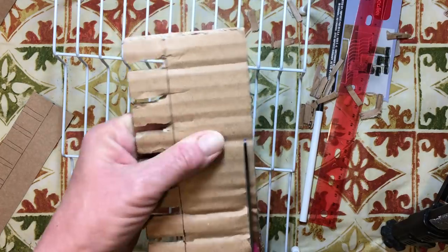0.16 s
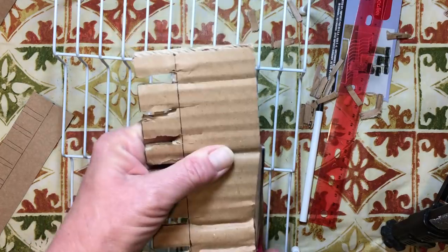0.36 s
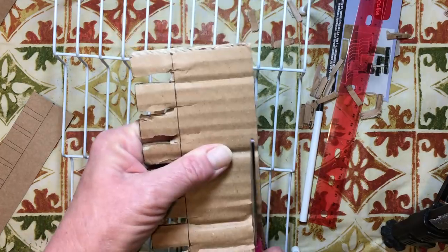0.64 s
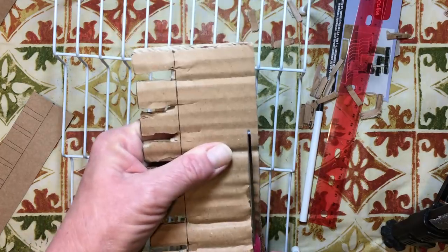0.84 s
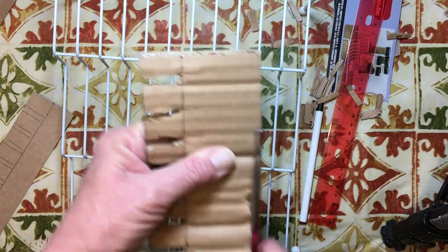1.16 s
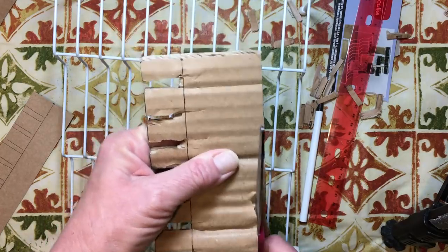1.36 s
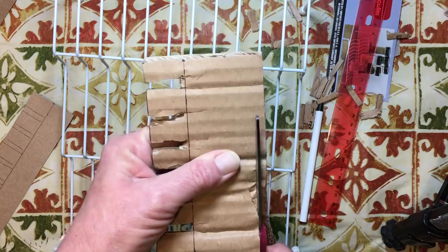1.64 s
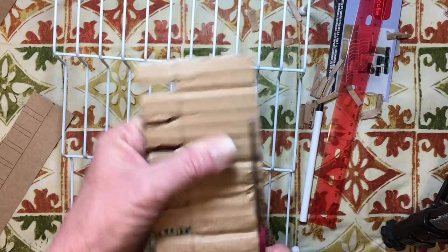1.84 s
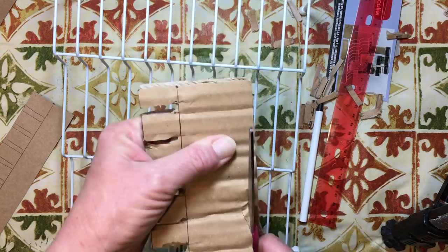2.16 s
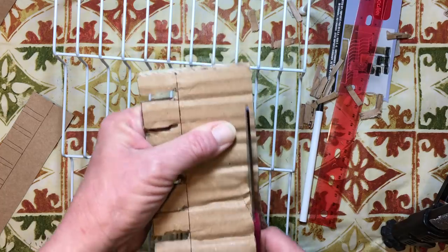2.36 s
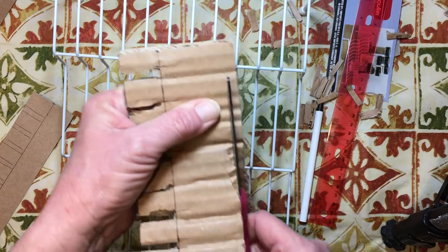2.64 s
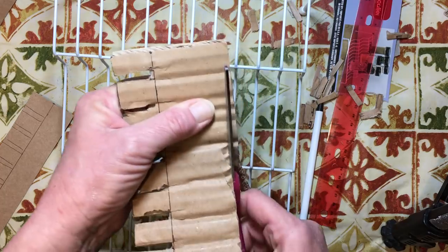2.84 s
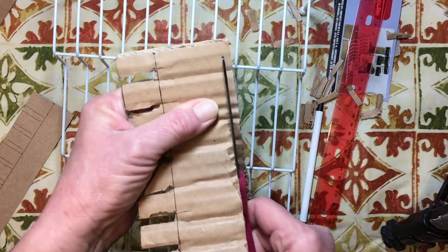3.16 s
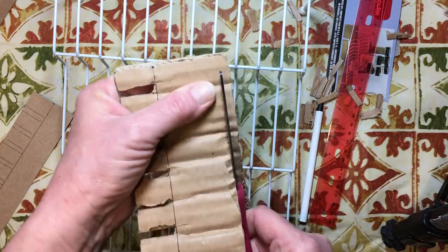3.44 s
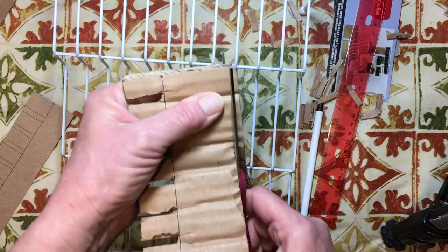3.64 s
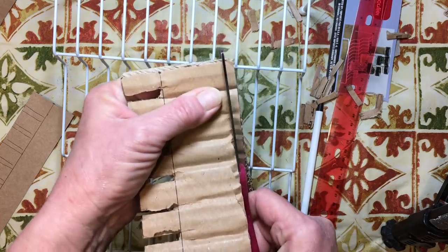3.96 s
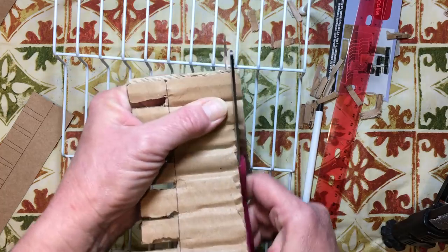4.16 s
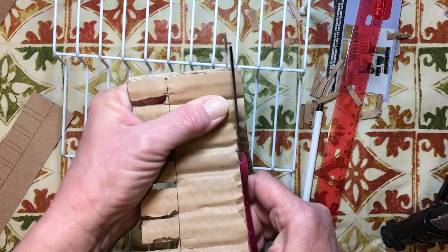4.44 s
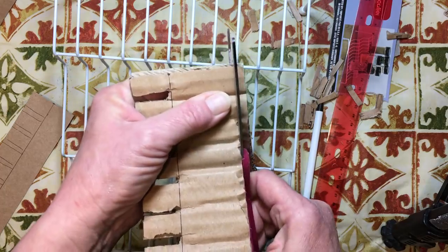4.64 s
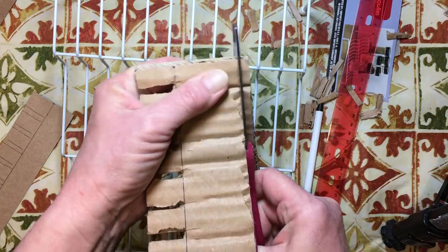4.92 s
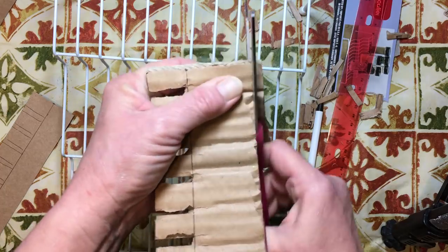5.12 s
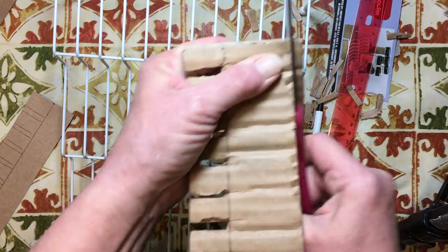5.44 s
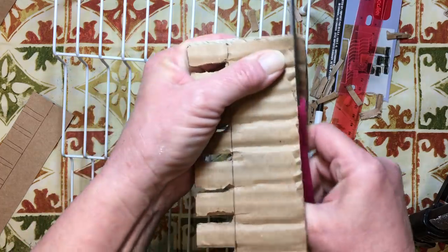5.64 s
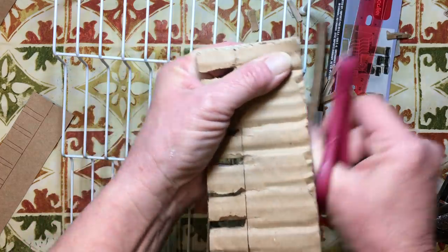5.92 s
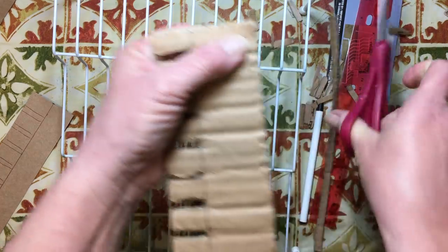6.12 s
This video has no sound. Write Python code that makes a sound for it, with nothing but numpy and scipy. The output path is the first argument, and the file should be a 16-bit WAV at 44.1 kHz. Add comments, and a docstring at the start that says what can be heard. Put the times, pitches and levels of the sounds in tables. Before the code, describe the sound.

Close scissors crunch and snap through a cardboard strip in repeated cuts, with light scraping and handling in a quiet room.

```python
"""Scissors cut a strip of corrugated cardboard, close to a mono microphone in a quiet room.
The closing blades snap through the flutes: each fracture cracks, rings the free flap and bends the strip.
Between cuts the open blades slide along the edge with a bright friction rasp, and fingers rustle the board.
At last the scissors are laid down with a few soft knocks. Short reflections follow every sound,
and a low hum hangs in the room."""
import sys
import numpy as np
from scipy import signal
from scipy.fft import rfft, irfft
from scipy.io import wavfile

SR = 44100
rng = np.random.default_rng(int(sys.argv[2]) if len(sys.argv) > 2 else 0)


def store_wav(level_fs):
    """Save 16-bit WAV to argv[1]."""
    pcm = np.round(np.clip(np.atleast_2d(level_fs), -1, 1) * 32767)
    wavfile.write(sys.argv[1], SR, pcm.T.astype(np.int16))


N = 277212

# Fractures, with flap and bending levels relative to level_db:
# (peak_s, level_db, flap_db, bending_db, rise_ms, fall_ms)
FRACTURES = [(0.03, -27.5, -16, -20, 0.65, 0.58), (0.1005, -23, -13, -34, 1.2, 0.44),
             (0.6106, -12.5, -36, -56, 0.55, 1.5), (0.695, -24.5, -13, -17, 1, 3.8),
             (0.6992, -31, -4, -8.5, 1.4, 1.1), (0.7222, -27, -12.5, -17, 2.2, 2.2),
             (0.776, -27, -6.5, -13.5, 0.56, 6.8), (0.796, -18, -48, -42, 1.2, 0.59),
             (0.814, -14, -25, -14, 2, 9.7), (0.823, -19, -5, -22, 1.8, 3),
             (0.827, -12, 7, -17.5, 0.47, 3.6), (0.841, -36, 2, -26, 2.7, 10),
             (0.871, -24, -3, -24, 1, 1.5), (0.8752, -22.5, -4, -12, 2.8, 1.7),
             (0.893, -16.5, -14, -28, 0.74, 0.49), (0.944, -33.5, -21, -36, 1, 3.6),
             (1.0394, -27.5, -11, -27.5, 1.6, 0.5), (1.106, -23.5, -12.5, -25, 0.93, 0.47),
             (1.33, -28.5, -6, -39, 1.5, 1.3), (1.5113, -32.5, -5, -1.5, 7.1, 4.4),
             (1.5352, -23.5, -9, -15.5, .56, 1.2), (1.566, -17, -3.5, -11.5, 6.4, 1.8),
             (1.6052, -9.5, -18.5, -10, 2.2, 3.7), (1.627, -27, -24, -20, 2.7, 1),
             (1.6497, -24.5, -9, -9, 1.4, 5.1), (1.6585, -15.5, -16, -46, 0.55, 1.5),
             (2.324, -26, -18.5, -40, 1.1, 0.47), (2.367, -24, -20, -15, 2.7, 2),
             (2.3706, -12, -10.5, -24, 0.73, 3.9), (2.4, -12.5, -17.5, -29, 6.6, 5.9),
             (2.419, -25.5, -14, -14, 5.6, 11), (2.4372, -29.5, -3, -13, 3.3, 7.2),
             (2.4713, -16, -16, -32, 0.73, 0.35), (2.491, -17.5, -4, -13, 1, 4.9),
             (2.506, -8.5, -14, -29, 0.61, 0.6), (2.516, -21, -27, -41, 1.5, 0.58),
             (2.5276, -26, -9, -9, 0.95, 1.1), (2.532, -11, -16.5, -18, 2, 0.51),
             (2.61, -33, -9, 5.5, 3, 5.4), (3.0248, -31.5, -19, -42, 1.6, 0.8),
             (3.056, -22, -15.5, -20, 2.4, 1.7), (3.094, -3.5, -5.5, -25.5, 0.88, 1.44),
             (3.1313, -16.5, -8, -11, 1.1, 1.7), (3.135, -17.5, -4, -14, 2, 1.5),
             (3.174, -20, -12, -6, 1, 3), (3.1992, -3, -11, -19, 0.6, 1.96),
             (3.218, -23, -13, -20, 0.73, 1.1), (3.8591, -24.5, -15.5, -9, 5.7, 1),
             (3.8825, -27, -30, -8, 0.87, 1.2), (3.9001, -3, -2.5, -26, 0.47, 3),
             (3.926, -30.5, -15, 2, 4.5, 3.5), (3.9482, -22, -15, -21, 1.1, .58),
             (3.981, -4.5, -9.5, -22.5, 1.4, 1.4), (3.9913, -19, -34, -32, 0.91, .8),
             (4.0102, -6, -17.5, -29.5, 0.69, 1.3), (4.129, -23.5, -15.5, -41, 0.92, .5),
             (4.385, -29, -29, -20, 1.2, 0.72), (4.416, -30, -44, -34, 0.4, 0.57),
             (4.4819, -16.5, -5, -15.5, 0.37, 8.2), (4.4916, -15.5, -12, -40, 5.9, 3.6),
             (4.519, -26, -19, -38, 0.55, 0.5), (4.5269, -18.5, -18.5, -45, 0.78, 0.48),
             (4.749, -25, -16, -23, 0.8, 4.3), (4.758, -25.5, -16.5, -28, 2.5, .6),
             (4.7771, -18, -6.5, -3, 2.7, 2.6), (4.8, -24, -37, -39, 1.3, .58),
             (4.813, -30.5, -19, 0, 2.9, 1.5), (4.8352, -16, -12.5, -13, 5.5, 1.8),
             (4.8831, 0.5, -21, -29, 1.6, 0.7), (4.901, -27, -31, -1, 3.1, 11),
             (4.9082, -17.5, -13, -17, 0.84, 4), (4.915, -13.5, -43, -26, 2, 1.4),
             (4.988, -30, -3, -39, 1.6, 1.6), (5.2933, -31, -21, -28, 1.4, 2.1),
             (5.325, -22.5, -18, -31, 0.9, .5), (5.359, -30, -32, -38, 1, .5),
             (5.3797, -24.5, -42, -46, 1.5, .5), (5.419, -25, -13, -9, 1.4, 8.1),
             (5.4337, -21.5, -3.5, -11, 1.7, 2.7), (5.4744, -5.5, -7.5, -16, 1.27, 2.2),
             (5.49, -8, -9, -25, 2, 0.16), (5.514, -11, -16, -18, 0.61, 2.5),
             (5.5193, -8.5, -22, -22, 1.6, 0.78), (5.5285, -10, -20, -27, 0.53, .5),
             (5.531, -6, -19, -14, 1.2, 2.2), (5.543, -21, -10, -10, 1.9, 0.91),
             (5.552, -18.5, -19, -6, 1.4, 1.8), (5.832, -20, -27, -24.5, 1, 0.58),
             (5.8443, -17.5, -18, -33, 0.89, 3), (5.8916, -5, -30, -19.5, 0.74, 5.4),
             (5.8979, -13, -8, -31, 2.2, 6.3), (5.9078, -7, -21, -23, 0.93, 0.69),
             (5.912, -17, -4.5, -6.5, 1.4, 1.4), (6.171, -34.5, -11, -6, 0.99, 11)]
# Ring of the blades, moving with the point of contact: (time_s, pitch_hz)
BLADE_PITCH = [(0, 5870), (.82, 8100), (1.6, 5500), (2.5, 7000), (3.09, 5750), (3.2, 5900), (3.9, 6140),
               (4.01, 6500), (4.88, 6740), (5.475, 7140), (5.49, 5550), (5.53, 7100), (5.55, 6030),
               (5.9, 8400)]
# Spectrum of breaking fibres: (frequency_hz, level_db)
CRACK_SPECTRUM = [(1180, -34), (2000, -5), (2870, -6.5), (3600, -5.5), (4200, -6), (5530, -5), (6240, -2),
                  (7610, -3.5), (9280, -1), (10500, -3), (12800, 1.5), (15700, -1)]


def snaps():
    """Brittle fracture: a burst of breaking fibres cracks and excites the blades, flap and strip."""
    size, lead = 4096, 1024   # samples in a burst, and before its peak
    ms = (np.arange(size) - lead) * 1000 / SR
    before_ms, after_ms = np.minimum(ms, 0), np.maximum(ms, 0)
    straining = 0.11 * np.exp(before_ms / 2.14) * (ms < 0)   # fibres stretch before they give
    settling = 0.13 * np.exp(-after_ms / 2.0)   # torn fibres creak on
    crack, flap = np.zeros((2, N + size + lead))
    forces = np.zeros((len(STRIP_MODES), N + size + lead))
    for s, db, flap_db, bending_db, rise_ms, fall_ms in FRACTURES:
        at = slice(round(s * SR), round(s * SR) + size)
        rise = np.exp(1.4 * before_ms / np.clip(rise_ms, .2, 5))
        fall = np.exp(-after_ms / np.clip(fall_ms, .2, 10))
        burst = grains(size, per_s=16000, spread_db=5.5) * (rise + straining)
        blow = (ms == 0) / max(fall_ms, 1.2)   # a quick break is one sharp blow
        tilt_db = -1.5 - 0.2661 * flap_db   # snaps that shake the board more are duller
        tear = tilted(burst * (fall + settling) + 4.1 * blow, tilt_db)
        blade_ring = resonance(tear, curve(s, BLADE_PITCH), width_hz=550)
        crack[at] += amp(db - 3) * (tear + amp(-6) * blade_ring)
        flap[at] += amp(db + flap_db) * flap_ring(burst * (fall + 0.8 * settling) + 16 * blow, s)
        forces[:, at] += amp(db + bending_db) * bending_forces(rise * fall, ms, s)
    flap = highpass(flap, hz=850, order=4)   # a small flap radiates little bass
    return (coloured(crack, CRACK_SPECTRUM) + flap + strip_bending(forces))[lead:lead + N]


# Note of the free flap of board, set by the grip: (time_s, pitch_hz)
FLAP_PITCH = [(0, 1720), (.83, 1890), (.9, 1790), (1.57, 2030), (1.6, 1180), (1.66, 1220), (2.37, 1490),
              (2.5, 1730), (2.9, 1800), (3.09, 1060), (3.13, 1320), (3.2, 1120), (3.85, 1650), (4.0, 1800),
              (4.5, 1830), (4.85, 2120), (4.89, 2900), (5.43, 2860), (5.476, 2530), (5.49, 2000),
              (5.515, 2700), (5.532, 4000), (5.545, 980), (5.85, 2520), (5.9, 2650), (5.912, 1060),
              (6.29, 1490)]
# Upper resonances of the flap: ratio_to_pitch
FLAP_RATIOS = [2.4, 1.3, 1.9]


def flap_ring(burst, s):
    """Damped resonance: the crushed flap rings briefly at its pitch and nearby modes; unit peak."""
    pitch_hz = curve(s, FLAP_PITCH)
    ring = resonance(burst, pitch_hz, width_hz=520)
    ring -= 0.26 * resonance(burst, max(0.36 * pitch_hz, 1050), width_hz=250)
    ring -= 0.66 * resonance(burst, 1.27 * pitch_hz, width_hz=800)
    for hz in pitch_hz * np.array(FLAP_RATIOS) * rng.uniform(0.85, 1.243, len(FLAP_RATIOS)):
        ring += 0.056 * resonance(burst, hz, width_hz=320)   # torn scraps ring unevenly
    return ring / np.max(np.abs(ring))


# Bending modes of the whole strip: (pitch_hz, width_hz, level_db)
STRIP_MODES = [(82, 19, 5), (156, 57, -4), (250, 97, -6.5), (340, 57, -2.5), (443, 51, 0), (546, 61, 0.5),
               (907, 57, 0)]


def strip_bending(forces):
    """Modal superposition: the bending modes add, alternating in sign, to a low thump."""
    return sum(amp(db + 40.5) * resonance(forces[k], hz, width_hz) * (-1) ** k
               for k, (hz, width_hz, db) in enumerate(STRIP_MODES))


# Bending pitch that the grip lets through best: (time_s, pitch_hz)
GRIP_PITCH = [(0, 452), (.82, 460), (.88, 340), (1.57, 300), (1.61, 455), (2.37, 300), (2.5, 340),
              (2.61, 205), (3.09, 250), (3.14, 220), (3.18, 436), (3.22, 444), (3.86, 173), (3.93, 170),
              (3.98, 298), (4.48, 203), (4.78, 570), (4.84, 543), (4.883, 347), (4.9, 530), (5.42, 260),
              (5.475, 420), (5.514, 330), (5.533, 450), (5.56, 398), (5.89, 470), (5.91, 338), (6.29, 500)]


def bending_forces(envelope, ms, s):
    """Selective damping: a snap jerks every mode, but the grip weakens those far from its pitch."""
    octaves_away = np.abs(np.log2(np.array(STRIP_MODES)[:, :1] / curve(s, GRIP_PITCH)))
    grip_db = -4 * octaves_away + 1.8 * rng.standard_normal((len(STRIP_MODES), 1))
    jerk = np.interp(ms - 0.8, ms, np.diff(envelope, prepend=0))   # the strip answers a little late
    return amp(grip_db) * jerk


# Ticks of parting fibres and, at the end, of the scissors touching the table: (start_s, level_db)
BRIGHT_TICKS = [(0.01, -17.5), (0.041, -34), (0.091, -20), (0.552, -34), (0.575, -50), (0.595, -25),
                (0.686, -29), (0.741, -27), (0.929, -36), (1.004, -31), (1.023, -22), (1.078, -17),
                (1.09, -30), (1.1603, -40), (1.497, -34), (1.57, -3), (1.598, -24), (1.6358, -16),
                (1.664, -22), (1.688, -35), (1.724, -34), (1.765, -28), (1.845, -24), (2.0316, -21),
                (2.072, -21), (2.27, -34), (2.279, -33), (2.313, -27), (2.456, -12), (2.6338, -29),
                (2.8863, -24), (2.9607, -45), (2.9767, -54), (3.012, -22), (3.075, -15), (3.1085, -17),
                (3.1574, -21), (3.1672, -14), (3.5403, -21), (3.808, -25), (4.1136, -23), (4.3121, -26),
                (4.4882, -23), (4.551, -20), (4.864, -22), (4.8763, -19), (4.8934, -18), (5.039, -29),
                (5.063, -25), (5.243, -40), (5.3012, -21), (5.349, -12), (5.342, -22), (5.386, -21),
                (5.4013, -16), (5.411, -17), (5.427, -14), (5.453, -23), (5.481, -9), (5.561, -19),
                (5.633, -29), (5.728, -14), (5.88, -24), (5.8965, 8.5), (5.903, -10), (5.9696, -32),
                (6.06, -37), (6.1035, -25), (6.192, -28)]


def ticks():
    """Impulsive excitation: each tick is a thin, bright burst of noise a millisecond or two long."""
    out, ms = np.zeros(N + 512), np.arange(512) * 1000 / SR
    decay = np.exp(-ms / 0.97)
    for s, db in BRIGHT_TICKS:
        out[round(s * SR):][:len(ms)] += amp(db - 9) * rng.standard_normal(len(ms)) * decay
    return coloured(tilted(out, db_per_octave=7.5), CRACK_SPECTRUM)[:N]


# Pushes of the hand in the hardest cuts: (start_s, level_db, pitch_hz)
HAND_PUSHES = [(3.1, -46, 89), (3.202, -52, 86), (3.902, -35.5, 164), (5.485, -34, 69), (5.53, -37, 105),
               (5.911, -38, 135)]


def heaves():
    """Damped free vibration: pushed by the hand, the whole strip swings with a deep, dull tone."""
    attack_s, t60_s = 0.0059, 0.13
    out, t = np.zeros(N + SR), np.arange(SR // 4) / SR
    for s, db, hz in HAND_PUSHES:
        envelope = amp(db - 60 * t / t60_s) * np.minimum(t / attack_s, 1)
        out[round(s * SR):][:len(t)] += envelope * np.sin(2 * np.pi * hz * t)
    return out[:N]


# Strokes of the open blades along the edge, with board and note levels relative to the rasp:
# (start_s, end_s, first_db, last_db, board_db, tilt_db_per_octave, note_hz, note_db)
BLADE_STROKES = [(0.12, 0.252, -38.5, -33, -24.5, -1, 2330, -54),
                 (0.386, 0.473, -19.5, -31.5, -20, -2, 3650, -27),
                 (1.23, 1.284, -23.5, -28, -17, 0.5, 2340, -25),
                 (1.837, 1.893, -49, -36.5, -22.5, -4, 2320, -50),
                 (1.96, 1.989, -32, -32, -20, 2, 1300, -45),
                 (2.092, 2.162, -24.5, -30.5, -17, -1, 2530, -37),
                 (2.778, 2.835, -24, -29.5, -21.5, 1.5, 1040, -22),
                 (3.349, 3.445, -34, -33, -21, -2, 1960, -41),
                 (3.586, 3.659, -23.5, -25, -21, 0.5, 3530, -30),
                 (4.201, 4.277, -23, -31.5, -19, -0.5, 2300, -23.5),
                 (4.923, 4.984, -48, -39, -21, -7, 2150, -33),
                 (5.042, 5.107, -48.5, -42, -17, -6, 3000, -28),
                 (5.115, 5.208, -24.5, -27, -21, 2, 3200, -25),
                 (5.665, 5.74, -46.5, -47, -14, -1, 2000, -30),
                 (5.739, 5.794, -24, -25, -24.5, 3, 4600, -17)]


def slides():
    """Sliding friction: fibres catch on the blade in dense grains, and the rubbed board sings faintly."""
    catch_s, release_s, arch_db = 0.0026, 0.0074, 1
    fibres = grains(N, per_s=24000, spread_db=2) * amp(0.69 * drift(rate_hz=130))
    edge, board, note = np.zeros((3, N))
    for start, end, first_db, last_db, board_db, tilt_db, note_hz, note_db in BLADE_STROKES:
        at = np.arange(round((start - .03) * SR), min(round((end + .06) * SR), N))
        t = at / SR
        progress = (t - start) / (end - start)
        travel = np.clip(progress, 0, 1)
        pressure = amp(first_db + (last_db - first_db) * travel + arch_db * np.sin(np.pi * travel))
        pressure *= np.exp(np.minimum(t - start, 0) / catch_s + np.minimum(end - t, 0) / release_s)
        friction = fibres[at] * pressure
        edge[at] += tilted(friction, tilt_db)
        board[at] += friction * amp(board_db + 7.4 * (progress - .5))   # takes over as the blade slows
        note[at] += amp(note_db) * pressure * rms_one(resonance(fibres[at], note_hz, width_hz=260))
    return rubbing(edge, board) + note


# Spectrum of the bright rasp at the edge: (frequency_hz, level_db)
EDGE_SPECTRUM = [(1180, -47), (2000, -14.5), (2340, -21), (2680, -17), (3410, -14), (4130, -8.5),
                 (6300, -11), (7740, -7.5), (9770, -3.5), (10400, -7), (12700, -2), (14500, -4),
                 (15700, -0.5)]
# Duller spectrum of the rubbed board: (frequency_hz, level_db)
BOARD_SPECTRUM = [(150, -30), (250, -5.5), (468, 1), (710, -13.5), (1180, 0.5), (2270, -3.5), (2670, -4.5),
                  (3440, -8.5), (4000, -10), (5200, -12), (8800, -120)]
# Resonances of blade and board: (pitch_hz, width_hz, level_db)
CONTACT_MODES = [(1002, 150, -5.5), (1740, 270, -10.5), (2300, 280, -6), (3220, 370, -5), (5250, 130, -7),
                 (6130, 1050, 1), (7000, 230, -7), (8930, 980, -12.5), (11200, 950, -5.5), (12400, 520, -4),
                 (13900, 510, -7), (14300, 290, -4.5)]


def rubbing(edge, board):
    """Source and filter: edge and board colour the grains; resonances come and go as the contact moves."""
    sound = coloured(edge, EDGE_SPECTRUM) + coloured(board, BOARD_SPECTRUM)
    return sound + sum(amp(db + 4.5 * drift(rate_hz=18)) * resonance(sound, hz, width_hz)
                       for hz, width_hz, db in CONTACT_MODES)


# Fingers shifting on the board: (time_s, level_db)
FINGER_RUSTLE = [(0, -51.5), (.3, -50), (.57, -68), (.95, -59), (1.2, -58), (1.38, -60), (1.43, -73),
                 (1.491, -66), (1.75, -56), (2.249, -65), (2.65, -58.5), (2.87, -49.5), (2.93, -82),
                 (2.99, -61.5), (3.3, -47), (3.5, -57.5), (3.75, -63.5), (3.81, -59.5), (4.1, -61.5),
                 (4.4, -59.5), (4.64, -67), (4.95, -52.5), (5.27, -55.5), (5.64, -61.5), (5.95, -50.5),
                 (6.02, -49), (6.05, -52.5), (6.085, -54), (6.11, -41.5), (6.16, -54.5), (6.22, -69),
                 (6.28, -53)]
# Blades pressing the flutes flat, with the board relative to level_db: (peak_s, level_db, board_db)
FLUTE_SQUEEZES = [(0.71, -61, -10), (0.821, -32, -11), (0.877, -52, -6), (1.063, -53.5, -6),
                  (1.556, -42, -15), (1.633, -48, -16), (2.048, -44, -13), (2.4, -40, -7.5),
                  (2.516, -39.5, -13), (3.1, -39.5, -7.5), (3.215, -61, -7), (3.567, -46.5, -9),
                  (3.908, -46, -13), (3.987, -34.5, -15), (4.175, -41, -14.5), (4.511, -43, -19),
                  (4.782, -36.5, -15.5), (4.897, -49, -7), (5.35, -42.5, -20), (5.523, -40, -13),
                  (5.83, -65, -29), (5.911, -56, 6.5), (6.187, -49, -13)]


def rustle():
    """Crackling under stress: fibres slip as the board is handled, is squeezed and springs back."""
    level = amp(curve(np.arange(N) / SR, FINGER_RUSTLE))
    for _, end, _, last_db, *_ in BLADE_STROKES:   # the edge creaks back after each slide
        level += swell(end, last_db - 28, fall_db_per_s=145.5)
    board = level * amp(-14)
    for s, db, board_db in FLUTE_SQUEEZES:
        squeeze = swell(s, db, fall_db_per_s=266)
        level += squeeze
        board += squeeze * amp(board_db)
    fibres = grains(N, per_s=6000, spread_db=2.5) * amp(3.15 * drift(rate_hz=26))
    lone_fibres = grains(N, per_s=43, spread_db=8.5)
    click = rng.standard_normal(40) * np.exp(-np.arange(40) / 27)
    clicks = rms_one(np.convolve(lone_fibres, click)[:N])
    crackle = amp(-2.5) * tilted(clicks, db_per_octave=5.7)
    return rubbing((fibres + crackle) * level, fibres * board)


# Scissors touching down on the table: (start_s, level_db)
TABLE_TAPS = [(6.06, -38), (6.172, -42), (6.192, -31.5)]
# Modes of the handle: (pitch_hz, level_db, t60_s)
HANDLE_MODES = [(770, -11, 0.039), (1010, 7, 0.011), (2830, 6, 0.01)]


def knocks():
    """Impact excitation: each soft tap rings the few short-lived modes of the handle."""
    out, t = np.zeros(N + SR), np.arange(SR // 10) / SR
    ring = sum(amp(db - 60 * t / t60_s) * np.sin(2 * np.pi * hz * t) for hz, db, t60_s in HANDLE_MODES)
    ring *= np.minimum(t / 0.00083, 1)
    for s, db in TABLE_TAPS:
        out[round(s * SR):][:len(t)] += amp(db) * ring
    return out[:N]


def echoes(x):
    """Reverberation: dense reflections from table and walls decay exponentially."""
    level_db, t60_s = -15, 0.11
    t = np.arange(SR // 4) / SR
    tail = rng.standard_normal(len(t)) * amp(-60 * t / t60_s) * np.minimum(t / 0.00037, 1)
    return amp(level_db) * signal.oaconvolve(x, tail / np.sqrt(np.sum(tail ** 2)))[:N]


# Wavering low tones of the room: (pitch_hz, width_hz, level_db)
HUM_TONES = [(49.3, 4.5, -54.5), (88.2, 1.7, -59.5), (178.6, 7.1, -64), (337.4, 7.4, -72)]
# Spectrum of the room's rumble and hiss: (frequency_hz, level_db)
ROOM_SPECTRUM = [(15, -63), (25, 2), (107, -8.5), (152, -12.5), (205, -22.5), (283, -23), (472, -45.5),
                 (688, -26.5), (901, -82), (4300, -52), (10500, -49.5), (11700, -52.5), (15700, -62)]
# Slow swell of the whole background: (time_s, gain_db)
ROOM_SWELL = [(0, 4), (.5, 3.5), (1.5, 1), (2.499, 1), (3.2, 1), (4.499, 0), (5.6, -1), (5.9, 1.5),
              (6.05, 0), (6.28, 0.5)]


def room():
    """Ambient noise: narrow bands of noise are heard as an unsteady hum over broad rumble and hiss."""
    white = rng.standard_normal(N + SR)
    hum = sum(amp(db) * rms_one(resonance(white, hz, width_hz)) for hz, width_hz, db in HUM_TONES)
    noise = amp(-54.5) * coloured(rng.standard_normal(N + SR), ROOM_SPECTRUM) + hum
    return noise[SR:] * amp(curve(np.arange(N) / SR, ROOM_SWELL))


def grains(count, per_s, spread_db):
    """Shot noise: tiny clicks of random time, size and sign; unit rms."""
    chance, size, sign = rng.random((3, count))
    size_db = -spread_db * np.log(1 - .995 * size)
    return rms_one((chance < per_s / SR) * amp(size_db) * np.sign(sign - .5))


def drift(rate_hz):
    """Random modulation: low-passed noise of unit rms."""
    pole = np.exp(-2 * np.pi * rate_hz / SR)
    return rms_one(signal.lfilter([1], [1, -2 * pole, pole * pole], rng.standard_normal(N + SR))[SR:])


def swell(s, db, fall_db_per_s, rise_db_per_s=394.5):
    """Exponential growth and decay: a gain that peaks at time s."""
    t = np.arange(N) / SR - s
    return amp(db + np.minimum(rise_db_per_s * t, -fall_db_per_s * t))


def resonance(x, hz, width_hz):
    """Damped oscillator: a two-pole filter with unit gain at its peak."""
    radius = np.exp(-np.pi * width_hz / SR)
    feedback = [1, -2 * radius * np.cos(2 * np.pi * hz / SR), radius ** 2]
    return signal.lfilter(np.array([1, 0, -1]) * (1 - radius ** 2) / 2, feedback, x)


def coloured(x, spectrum):
    """Minimum-phase filtering: imposes the spectrum causally; white input keeps its rms."""
    hz, db = np.transpose(spectrum)
    grid_hz = np.maximum(np.arange(4097) * SR / 8192, 1)
    gain = amp(np.interp(np.log(grid_hz), np.log(hz), db))
    cepstrum = irfft(np.log(gain))
    cepstrum[1:4096] *= 2   # fold onto positive time
    response = irfft(np.exp(rfft(cepstrum[:4097], 8192)))
    return signal.oaconvolve(x, response / np.sqrt(np.sum(response ** 2)))[:len(x)]


def tilted(x, db_per_octave):
    """Spectral tilt: the treble above 3 kHz pivots about 9 kHz."""
    hz = np.maximum(np.arange(len(x) // 2 + 1) * SR / len(x), 3000)
    return irfft(rfft(x) * amp(db_per_octave * np.log2(hz / 9000)), len(x))


def highpass(x, hz, order):
    """Bass roll-off below hz."""
    return signal.sosfilt(signal.butter(order, hz, "high", fs=SR, output="sos"), x)


def curve(s, points):
    """Linear interpolation of (time_s, value) points."""
    return np.interp(s, *np.transpose(points))


def amp(db):
    """Decibels to amplitude ratio."""
    return 10 ** (np.asarray(db) / 20)


def rms_one(x):
    """Normalisation to unit rms."""
    return x / np.sqrt(np.mean(x ** 2) + 1e-20)


def scene():
    """Superposition: direct sound, reflections and room noise add at one point; both channels are alike."""
    direct = slides() + rustle() + snaps() + ticks() + knocks() + heaves()
    return np.tile(direct + echoes(direct) + room(), (2, 1))


def record(dry):
    """Band limiting and saturation: deep bass rolls off, peaks are rounded, treble above 16 kHz is cut."""
    bass_cut_hz, treble_stop_hz, ceiling = 54.4, 15980, .9
    rounded = ceiling * np.tanh(highpass(dry, bass_cut_hz, order=2) / ceiling)
    return signal.sosfilt(signal.cheby2(20, 70, treble_stop_hz, fs=SR, output="sos"), rounded)


dry = scene()
out = record(dry)
store_wav(out)
```